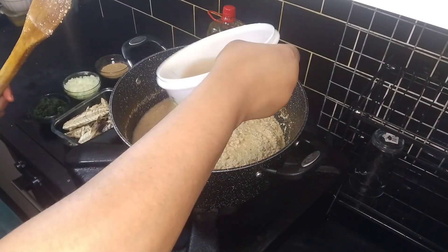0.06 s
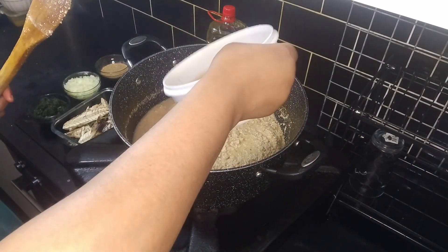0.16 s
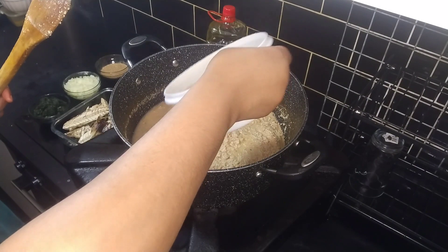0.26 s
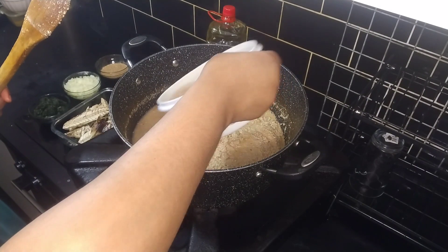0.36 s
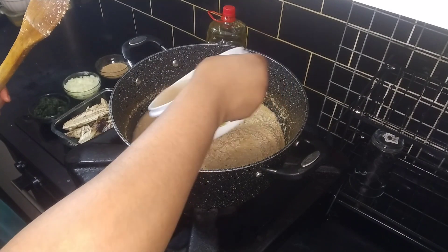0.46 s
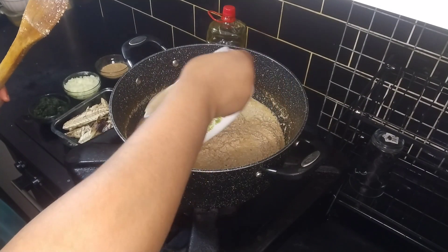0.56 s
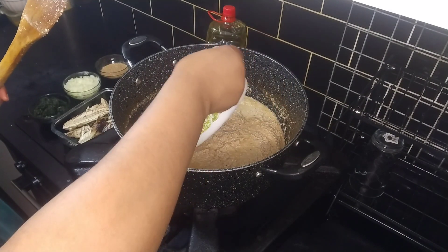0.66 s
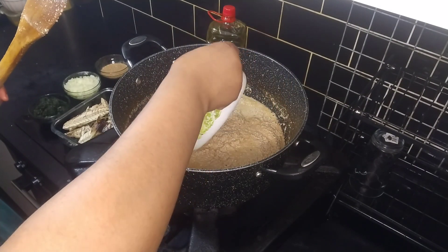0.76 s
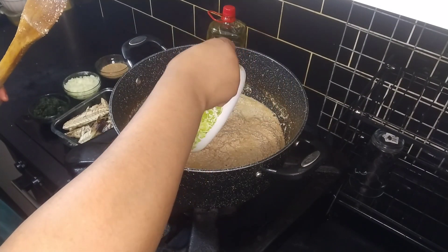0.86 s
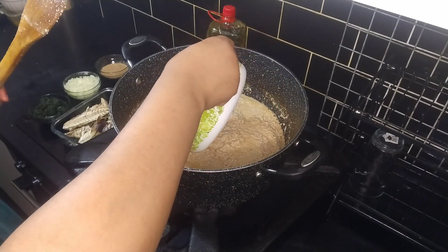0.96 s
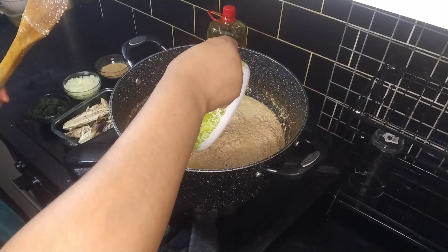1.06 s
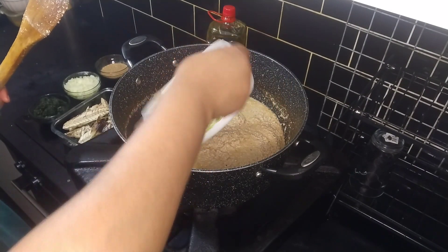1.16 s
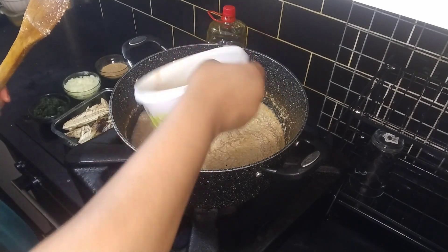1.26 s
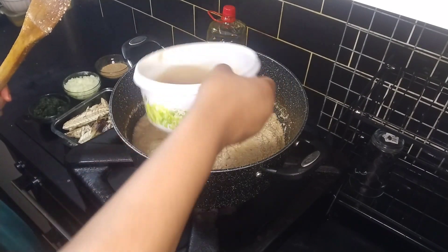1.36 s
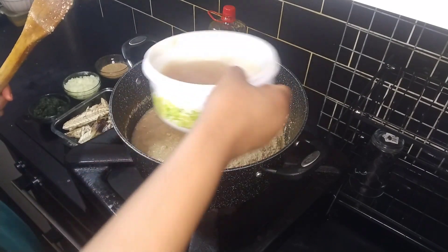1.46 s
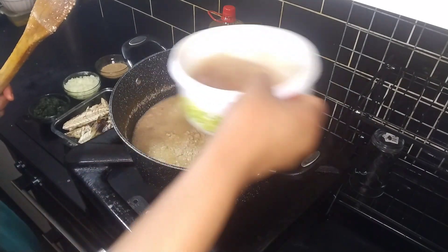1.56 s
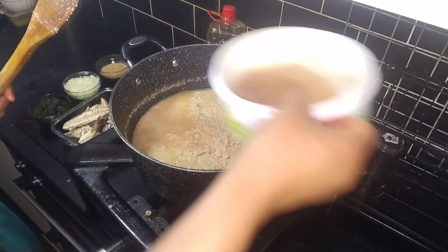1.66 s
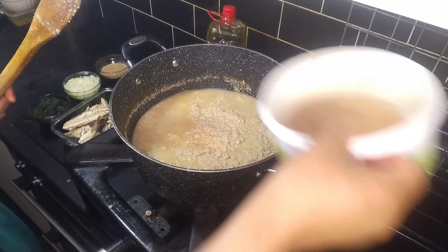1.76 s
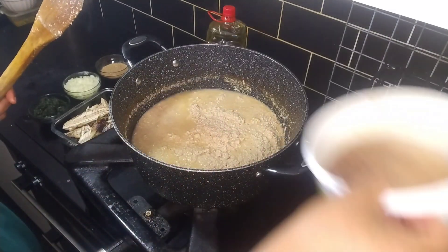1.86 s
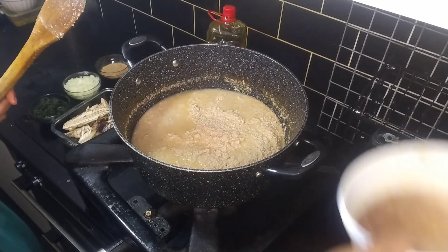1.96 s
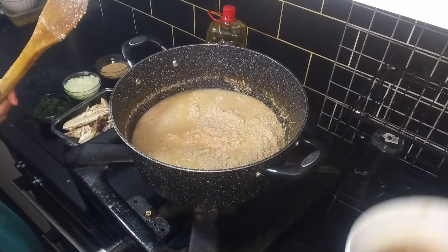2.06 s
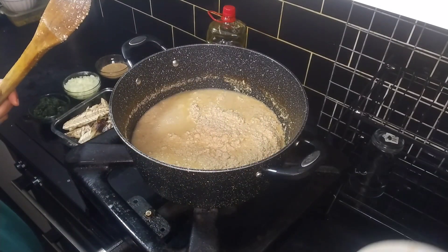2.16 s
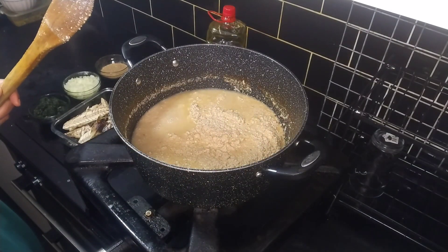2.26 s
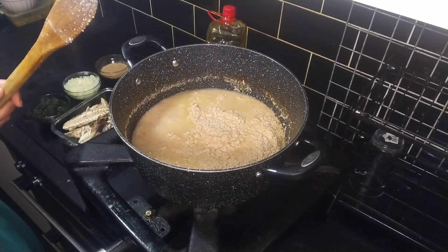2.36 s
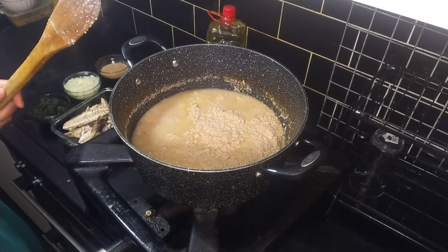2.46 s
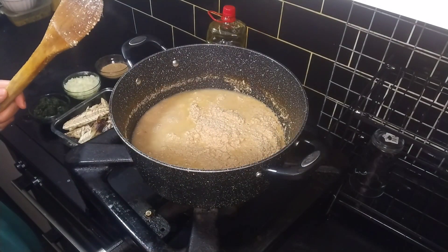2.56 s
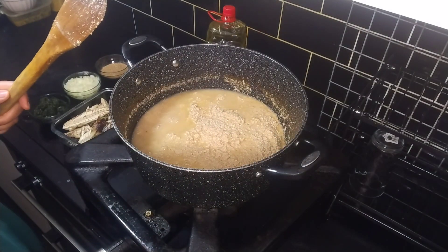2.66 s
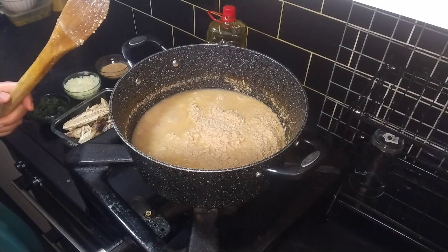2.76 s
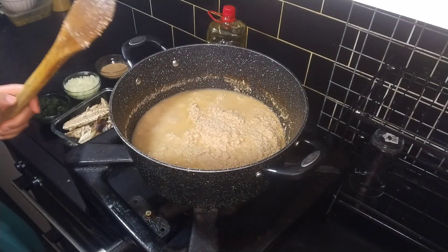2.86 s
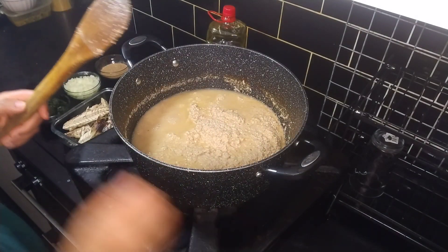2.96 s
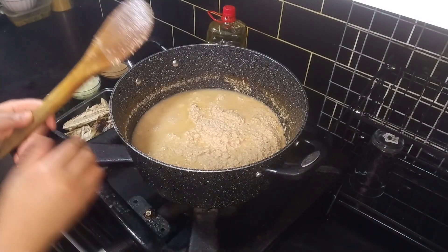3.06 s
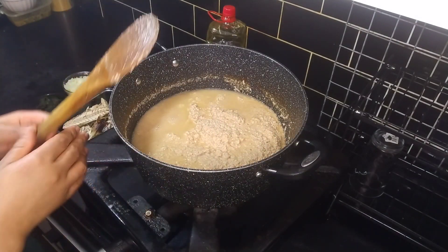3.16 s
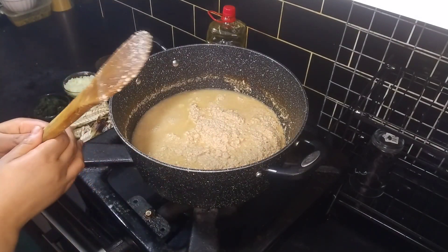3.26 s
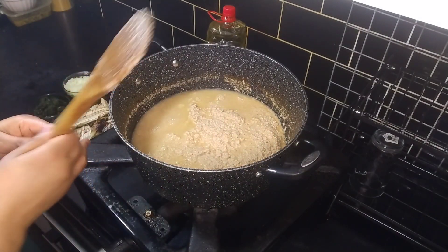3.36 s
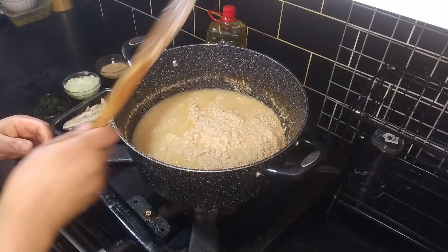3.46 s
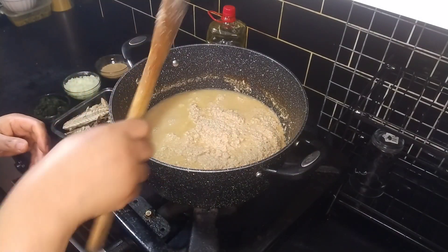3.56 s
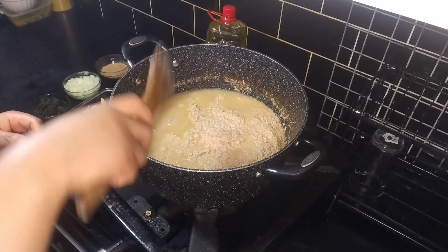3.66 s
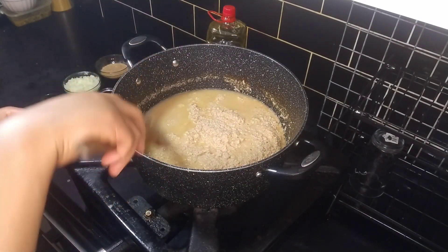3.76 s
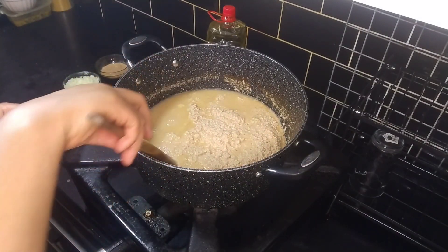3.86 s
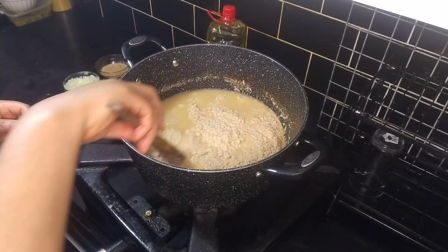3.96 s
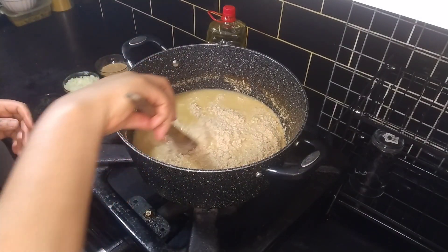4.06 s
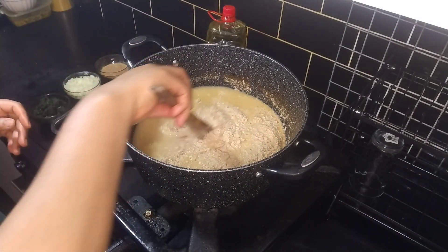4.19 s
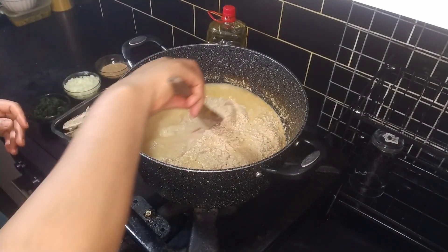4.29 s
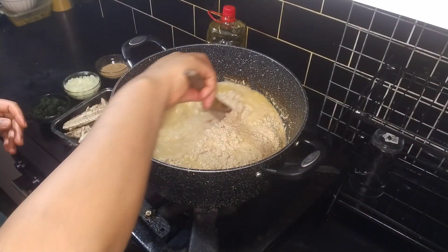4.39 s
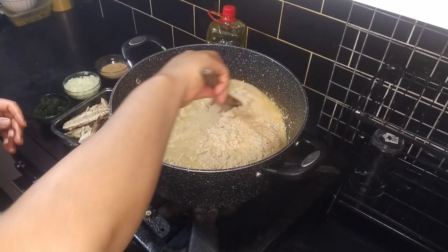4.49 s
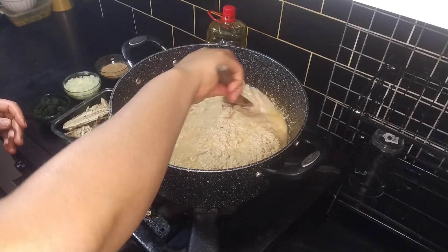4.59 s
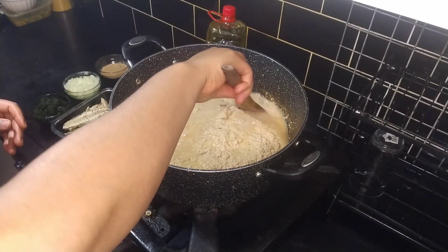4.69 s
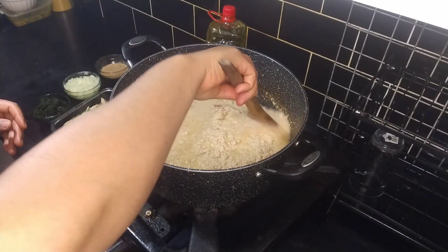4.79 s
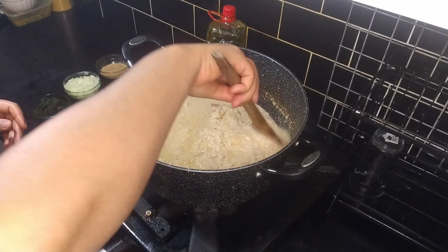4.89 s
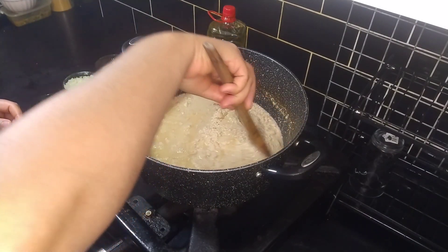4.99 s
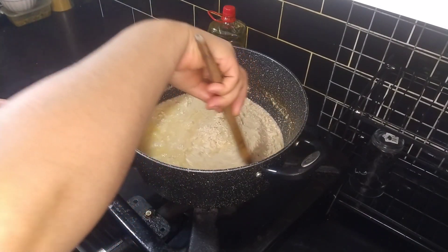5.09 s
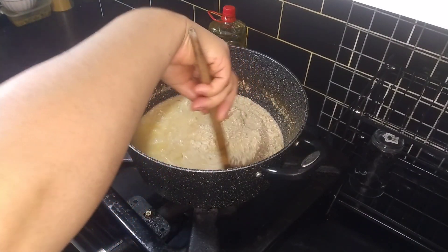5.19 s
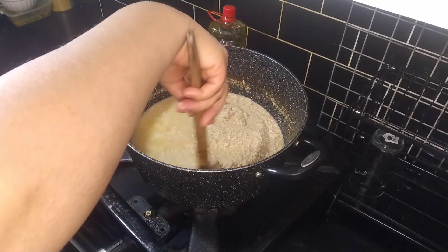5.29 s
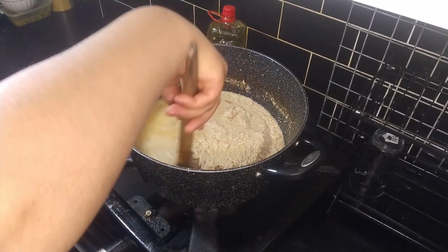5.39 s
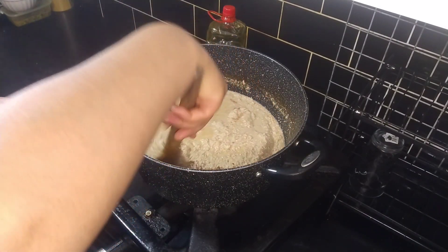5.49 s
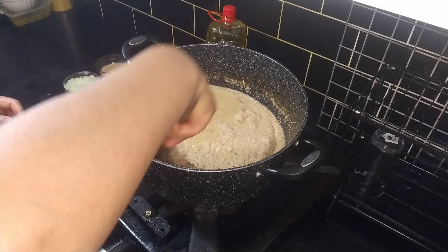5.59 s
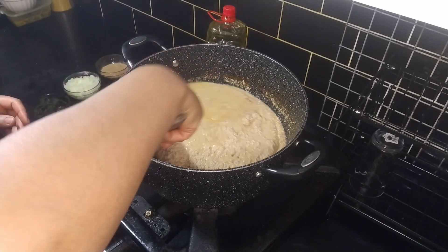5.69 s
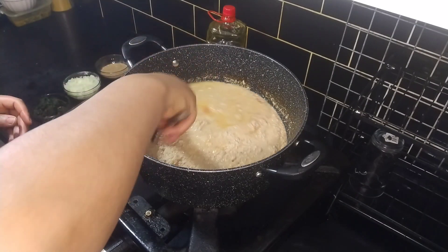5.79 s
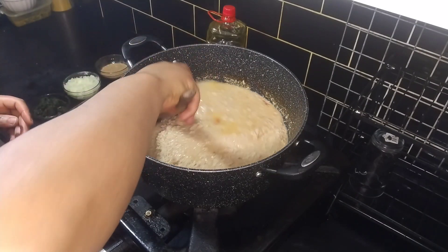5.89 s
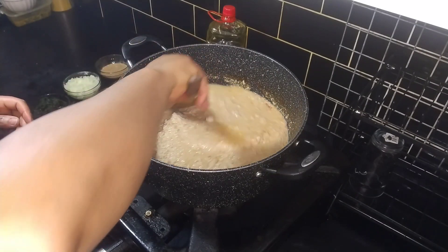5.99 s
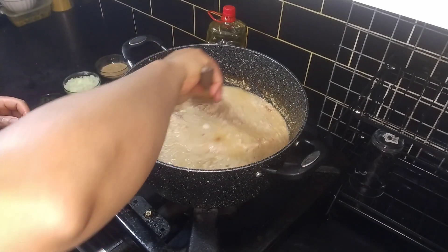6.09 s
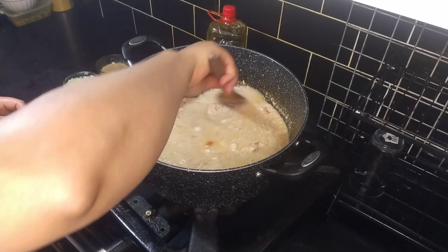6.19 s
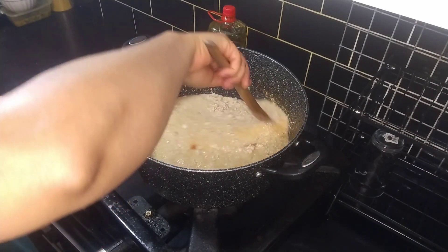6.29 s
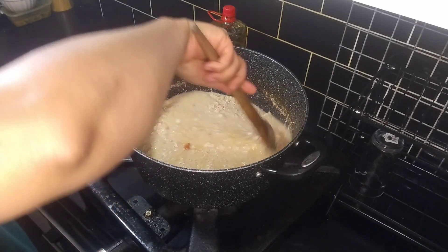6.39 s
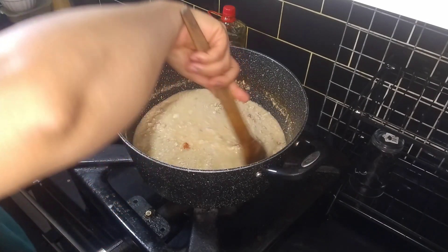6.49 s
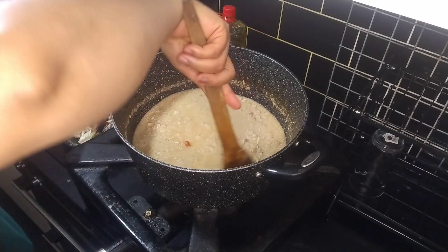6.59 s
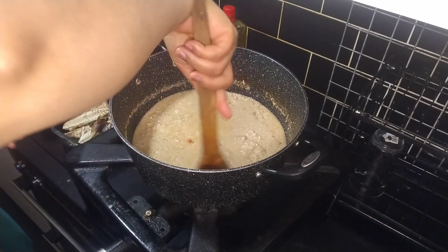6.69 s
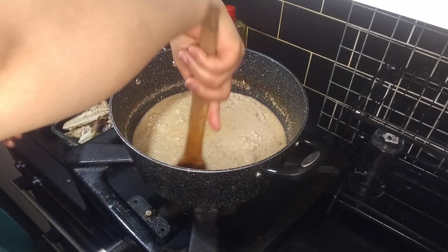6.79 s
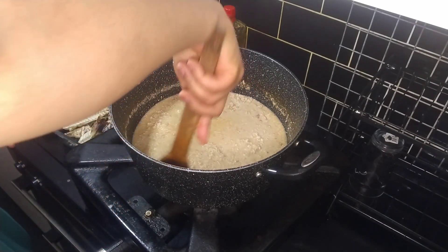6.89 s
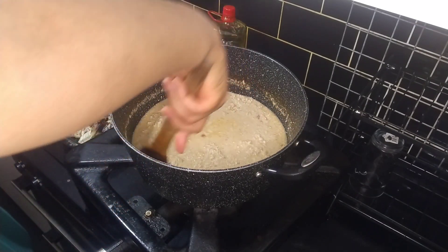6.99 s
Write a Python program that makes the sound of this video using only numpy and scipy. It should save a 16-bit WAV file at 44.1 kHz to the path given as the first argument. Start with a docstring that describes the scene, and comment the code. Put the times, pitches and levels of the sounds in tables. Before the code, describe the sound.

A bright, fine sizzle and a low mains hum run from the start while water tips into thick soup with a few wet plops and slops. A plastic jug lands with a loud hollow clack and rocks briefly. Then a wooden spoon stirs with soft squelches, light knocks and faint scrapes; one drag makes the sizzle flare before it calms. Close stereo pickup in a small tiled kitchen.

```python
"""A sizzle and a low mains hum are heard at once, as water is tipped with plops into a wide pot of thick soup.
A plastic jug is set down with a knock, and a wooden spoon taps, stirs and scrapes while the soup squelches.
The sizzle, which flares when the hot bottom is bared, is thousands of tiny clicks shaped into hiss.
Plops are short rising tones and noise; knocks are ringing tones and dying noise; squelches are many damped tones.
The room is coloured noise, and the hum is a wavering sine."""
import sys
import numpy as np
from scipy import signal
from scipy.fft import rfft, irfft
from scipy.io import wavfile

SR = 44100
rng = np.random.default_rng(int(sys.argv[2]) if len(sys.argv) > 2 else 0)


def master_out(mix):
    """Clip the mix to full scale and print it as 16-bit PCM to the path in sys.argv[1]."""
    frames = np.transpose(np.atleast_2d(mix))
    ceiling = np.clip(frames, -1, 1)
    pcm = np.round(ceiling * 32767).astype(np.int16)
    wavfile.write(sys.argv[1], SR, pcm)


N = 310391  # length in samples, about 7 seconds

# In all tables, t60_s is the time a sound takes to die away by 60 dB.
# Larger air pockets in the liquid: start_s, pitch_hz (at the start), level_db, t60_s, splashiness (0 to 1)
AIR_POCKETS = [(.341, 2160, -39.5, 0.076, 0.5), (0.769, 2970, -32.5, .035, 0.8),
               (0.806, 3150, -36, 0.076, 1), (.811, 1000, -51, .08, 1), (0.824, 426, -33.5, 0.15, 0),
               (1.042, 1030, -41, .08, .75), (1.045, 6470, -28.5, 0.066, .8), (1.074, 537, -30.5, .06, 0.4),
               (1.078, 1020, -39, 0.051, 0.93), (1.178, 2700, -36.5, 0.057, 0.7),
               (1.337, 715, -41.5, 0.098, 0.8), (1.352, 6440, -33, 0.1, 0.66),
               (1.357, 2240, -42.5, .086, 0.5), (3.602, 5300, -40, 0.045, 0.8),
               (3.804, 4060, -38, .045, 0.2), (4.712, 405, -37, 0.081, .4), (4.951, 2690, -35, 0.042, 0.34),
               (5.634, 1960, -34.5, .06, 0.46), (5.639, 1330, -40, 0.1, 0.3), (6.098, 2020, -41, .09, 0.3),
               (6.506, 1070, -29.5, .03, 0.1), (6.515, 3200, -41, 0.08, 0.44), (6.683, 406, -45, .1, 0.3),
               (6.741, 995, -43.5, .05, 0.1), (6.783, 1080, -39.5, 0.04, 0.3),
               (6.898, 1120, -43, 0.039, 0.6)]
# Light knocks of the wooden spoon: start_s, level_db (before the gains in taps)
SPOON_TAPS = [(1.076, -40.5), (2.896, -42.5), (3.541, -43.5), (4.636, -50), (5.288, -46), (5.635, -37.5),
              (5.933, -41.5), (6.306, -41.5), (6.407, -44.5), (6.415, -34)]
# Ringing tones of the spoon and the filled pot: pitch_hz, level_db, t60_s
POT_TONES = [(462, -4, 0.15), (1130, 0, 0.04), (1410, -13, 0.013), (1830, 9.5, 0.012), (3180, -21, .012),
             (5260, -4, .012), (6750, -13, .008)]
# The jug lands and rocks: start_s, clack_db, thump_db
JUG_LANDINGS = [(2.536, -11.5, -21.5), (2.579, -21, -28), (2.703, -30.5, -39), (2.745, -35, -44)]
# Ringing tones of the jug on the counter: pitch_hz, level_db, t60_s
JUG_TONES = [(670, -6.5, .2), (813, -8, 0.21), (917, -9, 0.15), (1256, -2, .22), (1373, -5, .25),
             (1473, -5, .14), (1600, -4.5, .24), (1666, -14, .22), (1880, -4, 0.18), (2490, -11, .18),
             (2930, -6, 0.16)]
# Low tones of the counter's thump: pitch_hz, level_db, t60_s
COUNTER_TONES = [(108, 1, 0.096), (72.3, -6, 0.36), (119.2, -21, 0.54), (135.5, -17.5, 0.39),
                 (254, -28, 0.32)]
# Tone colour of the jug's clack: pitch_hz, level_db (per Hz)
CLACK_COLOUR = [(200, 1), (700, -2), (1400, 7), (2800, 6), (4500, 2), (7000, 2.5), (9500, 3), (12000, -2.5),
                (16000, -12)]
# Duller tone colour of the clack's late tail: pitch_hz, level_db (per Hz)
LATE_TAIL_COLOUR = [(100, -7), (700, -5), (1150, -7), (1700, 3), (3200, -5), (5000, -5), (9000, -5)]
# Tone colour of the counter's boom: pitch_hz, level_db (per Hz)
BOOM_COLOUR = [(30, -20), (75, 2), (160, 2), (250, -9), (600, -42), (3000, -70)]
# Tone colour of the sizzle: pitch_hz, level_db (per Hz)
SIZZLE_COLOUR = [(300, -34.5), (1000, -18), (2000, -15), (3000, -10.5), (3800, -11), (4800, -10.5),
                 (5800, -8.5), (7400, -4.5), (8600, -0.5), (9600, 0), (10800, -1.5), (12000, -7),
                 (13500, -10.5), (16000, -14.5)]
# Tone colour that fresh contact with hot metal adds: pitch_hz, change_db
FRESH_COLOUR = [(1000, 0.5), (5000, -0.06), (8300, -2.5), (10400, 1), (12000, 2), (16000, -1)]
# Tone colour put on the spoon's scrape: pitch_hz, level_db
SCRAPE_COLOUR = [(100, -14), (190, 13.5), (320, 7), (600, 2), (1000, -5), (1400, -4), (2200, -4),
                 (4000, -15), (7000, -16), (15000, -8.5)]
# Tone colour put on the squelching bubbles: pitch_hz, level_db
SQUELCH_COLOUR = [(150, 2), (280, -2), (450, 3.5), (700, 2), (1100, -4.5), (1700, -9.5), (3000, 0),
                  (7000, -26)]
# Tone colour of the wet film torn by the spoon: pitch_hz, level_db (per Hz)
SMEAR_COLOUR = [(800, -26), (1700, -9.5), (2800, -8), (4600, 6), (6500, -1), (10000, -18), (16000, -30)]
# Tone colour of the pot's rumble on the stove: pitch_hz, level_db (per Hz)
RUMBLE_COLOUR = [(20, 4), (50, 10.5), (85, 9), (160, -6.5), (260, 7.5), (400, 0), (900, -44), (4000, -62)]
# Tone colour of the room's steady rush: pitch_hz, level_db (per Hz)
ROOM_COLOUR = [(15, 9), (35, 6), (55, 0), (80, -7), (140, -6.5), (210, -19), (280, -15.5), (350, -16),
               (470, -8.5), (700, -10), (1000, -16.5), (1650, -19), (2700, -16.5), (3700, -21), (7000, -11),
               (11000, -29), (16000, -29)]
# Resonances in the room's steady noise: pitch_hz, width_hz, level_db (rms)
ROOM_DRONES = [(101, 17, -70.5), (148.5, 16, -63.5), (257.7, 8.6, -68.5), (296.7, 21, -64),
               (416.4, 17, -60.5), (538, 24, -66), (637, 15, -70), (963, 14, -64), (1070, 24, -67.5),
               (2666, 130, -67), (13000, 400, -63)]
# How alike left and right are: pitch_hz, likeness (1 is the same, 0 is unrelated)
STEREO_LIKENESS = [(30, 0.55), (100, 0.77), (270, 0.83), (450, 0.91), (740, 0.28), (1200, 0.032),
                   (16000, 0.66)]
# Difference between the microphones: pitch_hz, left_minus_right_db
STEREO_BALANCE = [(30, 1.5), (100, -3), (200, 0.5), (600, 0.7), (2000, -0.2), (4500, -0.4), (8500, 2),
                  (11000, -3), (14000, -3.5)]
# Standing waves in the air of the open pot: pitch_hz, width_hz, boost_db (below 0 is a cut)
POT_AIR_TONES = [(471, 13, 8.5), (880, 39, 4), (1137, 34, 10.5), (1314, 77, 5.5), (1483, 33, 7.5),
                 (1650, 29, 10.5), (1840, 110, 6.5), (1880, 11, 2), (2230, 47, 5.5), (2880, 47, -3),
                 (4000, 100, 0.5), (4660, 330, 3)]
# Dull bumps against the stove and counter: start_s, level_db (before the gain in bumps)
SOFT_BUMPS = [(3.265, -36.5), (3.593, -36)]
# Low tones of the stove top: pitch_hz, level_db, t60_s
STOVE_TONES = [(166, -10.5, 0.072), (238, -2.5, 0.059), (306, -3.5, 0.035)]
# Surges as the water slops in: start_s, churn_db
WATER_SURGES = [(.77, -46.5), (1.04, -50.5), (1.325, -57)]
# Strokes of the spoon round the pot: start_s, length_s, churn_db
SPOON_STROKES = [(3.744, 1.6, -58.5), (5.157, 0.92, -57), (6.093, 1.9, -57.5)]
# Soup spits on the hot wall: start_s, sizzle_db (before the sizzle's overall gain)
SOUP_SPITS = [(4.06, -47), (5.275, -40.5), (5.425, -45), (5.73, -43), (6.3, -53), (6.59, -54)]
# The spoon meets the bottom and shoves the pot: start_s, rumble_db
POT_SHOVES = [(3.92, -52.5), (4.56, -55)]

HUM_HZ, HUM_DB = 99.7, -56  # the level wavers around this value
KITCHEN_T60_S = 0.27
CUTOFF_HZ = 15740
RIGHT_DELAY = 4  # samples
POUR_START_S, POUR_END_S = 0.0, 1.3
SURGE_RISE_S, SURGE_FALL_DB_PER_S = 0.054, 77
# One stroke drags along the bottom and bares the hot metal.
BARE_START_S, BARE_END_S = 5.135, 5.736
FLARE_DB, FLARE_RISE_S, FLARE_FALL_DB_PER_S = -42, 0.17, 28  # level before the sizzle's overall gain
FLARE_JUMP = 0.48  # share of the flare's gain that comes at first touch
# The frying calms as the pot cools, faster once it is stirred.
SIMMER_DB = -42  # at the start, before the sizzle's overall gain
COOLING_DB_PER_S, STIR_COOLING_DB_PER_S = 0.5652, 1.94  # the second adds to the first
SPIT_RISE_S, SPIT_FALL_DB_PER_S = 0.0052, 109
# Each landing rebounds once; the counter gives a moment after each contact.
REBOUND_S, REBOUND_LOSS_DB, THUMP_LAG_S = 0.0225, 15.5, 0.0022
# The clack dies in three stages.
CRACK_T60_S, TAIL_T60_S, LATE_T60_S = 0.06, 0.21, 0.45


def from_db(db):
    """Turn decibels into a gain."""
    return 10 ** (np.asarray(db) / 20)


def rms_one(x):
    """Scale a sound to an average (rms) level of 1."""
    return x / np.sqrt(np.mean(x ** 2) + 1e-20)


def at_hz(points, hz):
    """Read a table between its points, with pitch on a logarithmic scale."""
    table_hz, value = np.transpose(points)
    return np.interp(np.log(np.maximum(hz, 1)), np.log(table_hz), value)


def bins(x):
    """Frequencies in the spectrum of x."""
    return np.fft.rfftfreq(x.shape[-1], 1 / SR)


def colour(x, spectrum):
    """Make some pitches of a sound stronger and others weaker, then set its rms to 1."""
    gains = from_db(at_hz(spectrum, bins(x)))
    return rms_one(irfft(rfft(x) * gains, x.shape[-1]))


def drift(per_s):
    """A random wavering line with rms 1, made of straight steps between random points."""
    knots = rng.standard_normal(4000)
    return rms_one(np.interp(np.arange(N) / SR * per_s, np.arange(len(knots)), knots))


def spread(pair):
    """Mix two unrelated noises into left and right, as alike as the table says; the right comes later."""
    alike = at_hz(STEREO_LIKENESS, bins(pair))
    mid, side = rfft(pair) * np.sqrt([1 + alike, 1 - alike])
    left, right = irfft(np.array([mid + side, mid - side]), pair.shape[-1]) / np.sqrt(2)
    return np.array([left, np.roll(right, RIGHT_DELAY)])


def grains(per_s, size_db):
    """Random tiny clicks of uneven size, in two channels."""
    sizes = from_db(size_db * np.minimum(rng.exponential(1, (2, N)), 4))
    signs = rng.choice([-1, 1], (2, N))
    return sizes * signs * (rng.random((2, N)) < per_s / SR)


def ring(clicks, hz, t60):
    """Each click sets a dying sine ringing, as a tap does to a solid body or a bubble."""
    decay = np.exp(-np.log(1000) / (t60 * SR))
    turn = 2 * np.pi * hz / SR
    # the tiny offset keeps the filter away from vanishingly small numbers
    return signal.lfilter([0, np.sin(turn)], [1, -2 * decay * np.cos(turn), decay ** 2], clicks + 1e-18)


def blows(times, levels_db):
    """One click at each time."""
    clicks = np.zeros(N)
    clicks[np.round(times * SR).astype(int)] = from_db(levels_db)
    return clicks


def struck(times, levels_db, modes, vary_db):
    """Each blow rings every tone of a body, with a random strength for each tone."""
    out = np.zeros(N)
    for k, (hz, db, t60) in enumerate(modes):
        strengths_db = levels_db + db + vary_db * rng.standard_normal(len(times))
        out += (-1) ** k * ring(blows(times, strengths_db), hz, t60)
    return out


def dying_noise(spectrum, t60):
    """Half a second of fading stereo noise stands for many close tones or echoes."""
    t = np.arange(SR // 2) / SR
    noise = colour(spread(rng.standard_normal((2, len(t)))), spectrum)
    return noise * np.exp(-np.log(1000) * t / t60)


def through(x, response):
    """Every click of a mono sound starts a copy of a stereo response."""
    return signal.fftconvolve(x[None], response)[:, :N]


def kitchen(x, wet_db, near_t60=0.11, far_db=-10):
    """The direct sound comes first, with quick echoes off the tiles and a longer room echo."""
    walls = [(100, -3.0), (1000, 0.5), (8000, 3.0), (16000, -39)]
    echoes = dying_noise(walls, near_t60) + from_db(far_db) * dying_noise(walls, KITCHEN_T60_S)
    echoes = echoes / np.sqrt(np.sum(echoes ** 2) / 2)
    direct = np.array([x, np.roll(x, RIGHT_DELAY)])
    return direct + from_db(wet_db) * through(x, echoes)


def gesture(start, end, rise_s, fall_db_per_s, jump=0):
    """A gain that starts at the jump, rises to 1, holds until the end, then dies away."""
    t = np.arange(N) / SR
    rise = np.clip(jump + (1 - jump) * (t - start) / rise_s, 0, 1)
    fall = from_db(-fall_db_per_s * np.maximum(t - end, 0))
    return (t > start) * rise * fall


def swells(rows, rise_s, fall_db_per_s):
    """A rise and a fall for each start_s, level_db row, as one gain."""
    return sum(from_db(db) * gesture(s, s + rise_s, rise_s, fall_db_per_s) for s, db in rows)


def together(*gains):
    """Combine gains by adding their power, as unrelated sounds do."""
    return np.sqrt(sum(gain ** 2 for gain in gains))


def stirring(ease=0.56):
    """The spoon speeds up and slows down once in each stroke; returned as a gain."""
    t = np.arange(N) / SR
    out = np.zeros(N)
    for start, length, db in SPOON_STROKES:
        progress = np.clip((t - start) / length, 0, 1)
        out += from_db(db) * np.abs(np.sin(np.pi * progress)) ** ease
    return out


def room_tone(level_db=-48.0, waver_db=-2.5):
    """The stove and room make a steady rush of noise, with droning resonances and a mains hum."""
    rush = from_db(level_db) * colour(spread(rng.standard_normal((2, N))), ROOM_COLOUR)
    white = spread(rng.standard_normal((2, N)))
    hz_axis = bins(white)
    power = np.zeros(len(hz_axis))
    for hz, width, db in ROOM_DRONES:
        peak = from_db(db) ** 2 * SR / (np.pi * width)
        power += peak / (1 + ((hz_axis - hz) / width) ** 2) ** 2
    drone = irfft(rfft(white) * np.sqrt(power), N)
    phase = 2 * np.pi * HUM_HZ * np.arange(N) / SR + 0.54 * drift(5)
    hum = np.sqrt(2) * np.sin(phase) * from_db(HUM_DB + waver_db * drift(34))
    return rush + drone + hum


def bumps(level_db=-2):
    """Soft contacts ring only the stove top's low tones."""
    times, db = np.transpose(SOFT_BUMPS)
    return kitchen(struck(times, db + level_db, STOVE_TONES, vary_db=1), wet_db=-7)


def pot_rumble(stirred_db=-6, shove_rise_s=0.096, shove_fall_db_per_s=45):
    """Random clicks become dull bumps of the pot on the stove as the spoon pushes."""
    shoves = swells(POT_SHOVES, shove_rise_s, shove_fall_db_per_s)
    push = together(from_db(stirred_db) * stirring(), shoves)
    return colour(spread(grains(400, size_db=5.0)), RUMBLE_COLOUR) * push


def jug_set_down():
    """The jug's base clacks on the counter, which thumps and booms; the jug rocks and settles."""
    crack_db, tail_db, late_db = -8, -17, -24
    ring_db, boom_db, boom_t60 = -23, -21, 0.98
    snap_db, snap_hz, snap_t60 = -2, 1100, 0.0031
    contacts = np.array(JUG_LANDINGS)
    rebounds = contacts + [REBOUND_S, -REBOUND_LOSS_DB, -REBOUND_LOSS_DB]
    times, clack_db, thump_db = np.vstack([contacts, rebounds]).T

    response = from_db(crack_db) * dying_noise(CLACK_COLOUR, CRACK_T60_S)
    response += from_db(tail_db) * dying_noise(CLACK_COLOUR, TAIL_T60_S)
    response += from_db(late_db) * dying_noise(LATE_TAIL_COLOUR, LATE_T60_S)
    clack = through(blows(times, clack_db), response)

    snap = ring(blows(times, clack_db + snap_db), snap_hz, snap_t60)
    jug_ring = struck(times, clack_db + ring_db, JUG_TONES, vary_db=1)
    body = kitchen(jug_ring - snap, wet_db=-5)

    thump = np.zeros(N)
    for hz, db, t60 in COUNTER_TONES:
        thump += ring(blows(times + THUMP_LAG_S, thump_db + db), hz, t60)
    high_pass = signal.butter(1, 40, "high", fs=SR, output="sos")
    boom = through(blows(times, thump_db + boom_db), dying_noise(BOOM_COLOUR, boom_t60))
    return clack + body + signal.sosfilt(high_pass, thump) + boom


def taps(crack_db=-1.5, body_db=-5.5):
    """Each wooden knock is a broad click and a few tones that the soup soon damps."""
    times, db = np.transpose(SPOON_TAPS)
    wood_colour = [(200, -4), (700, 1), (1400, 8), (2400, 1), (3800, -1.5),
                   (5600, 5.5), (7500, 1), (10000, -12), (15000, -33)]
    wood = dying_noise(wood_colour, t60=0.17)
    body = kitchen(struck(times, db + body_db, POT_TONES, vary_db=1), wet_db=-5)
    return through(blows(times, db + crack_db), wood) + body


def plops(rise=0.15, splash_db=-3):
    """Each air pocket rings briefly, rising in pitch; a splashy one breaks into a spray of noise."""
    tones, sprays = np.zeros((2, N + SR))  # spare room for the last tails
    t = np.arange(SR // 4) / SR
    for s, hz, db, t60, splashy in AIR_POCKETS:
        age = t / t60
        pitch_hz = hz * (1 + rise * np.minimum(age, 1))
        tone = np.sin(2 * np.pi * np.cumsum(pitch_hz) / SR)
        around_pitch = [(hz / 10, -40), (hz / 2, -21), (hz, 0), (hz * 2, -22), (hz * 10, -50)]
        spray = colour(rng.standard_normal(len(t)), around_pitch)
        envelope = from_db(db) * np.exp(-np.log(1000) * age) * (1 - np.exp(-t * hz))
        start = round(s * SR)
        span = slice(start, start + len(t))
        tones[span] += np.sqrt(1 - splashy ** 2) * tone * envelope
        sprays[span] += splashy * from_db(splash_db) * spray * envelope
    return kitchen(tones[:N], wet_db=-6) + kitchen(sprays[:N], wet_db=1)


def small_plops(per_s=1.8, level_db=5, size_db=7.0, t60=0.054, count=10):
    """Smaller air pockets pop at random in the spoon's wake, each ringing at one of a few pitches."""
    out, speed = np.zeros(N), stirring()
    for hz in np.geomspace(420, 1250, count):
        born = rng.random(N) < per_s / SR
        sizes = from_db(level_db + size_db * rng.uniform(-0.92, 1, N))
        out += ring(born * sizes * speed, hz, t60)
    return kitchen(out, wet_db=-1.5)


def scrape(level_db=-50, bite_s=0.16, rise_s=0.13, fall_db_per_s=70, graze_db=-3.0):
    """The spoon's edge slips over the crust in small jerks: light grazes and one hard drag."""
    slips = spread(grains(1500, size_db=4.0))
    drag = from_db(level_db) * gesture(BARE_START_S + bite_s, BARE_END_S, rise_s, fall_db_per_s)
    motion = together(drag, from_db(graze_db) * stirring())
    return colour(slips, SCRAPE_COLOUR) * motion * from_db(0.73 * drift(45))


def smear(level_db=-1, per_s=900, size_db=3.5, lag_s=0.25):
    """The film of soup behind the spoon tears in many tiny wet smacks."""
    t = np.arange(N) / SR
    delayed_stir = np.interp(t - lag_s, t, stirring())
    return colour(grains(per_s, size_db), SMEAR_COLOUR) * from_db(level_db) * delayed_stir


def churn(per_s=16, cycles=14, count=24, simmer_db=-61):
    """Thick soup folds over itself: small damped bubbles ring at many pitches."""
    out = np.zeros(N)
    for hz in np.geomspace(220, 4000, count):
        born = rng.random(N) < per_s / SR
        bubbles = ring(born * rng.standard_normal(N), hz, cycles / hz)
        out += rms_one(bubbles) * np.sqrt(hz)
    surges = swells(WATER_SURGES, SURGE_RISE_S, SURGE_FALL_DB_PER_S)
    motion = together(from_db(simmer_db), surges, stirring())
    return colour(kitchen(out, wet_db=0.5), SQUELCH_COLOUR) * motion


def frying_db(pour_db=-49.5, pour_rise_s=0.02, pour_fall_db_per_s=45, stirred_db=-1.0):
    """A slowly cooling sizzle is fed by poured water, stirring, the bared bottom and single spits."""
    t = np.arange(N) / SR
    stirred_s = np.maximum(t - SPOON_STROKES[0][0], 0)
    simmer = from_db(SIMMER_DB - COOLING_DB_PER_S * t - STIR_COOLING_DB_PER_S * stirred_s)
    poured = from_db(pour_db) * gesture(POUR_START_S, POUR_END_S, pour_rise_s, pour_fall_db_per_s)
    bared = gesture(BARE_START_S, BARE_END_S, FLARE_RISE_S, FLARE_FALL_DB_PER_S, FLARE_JUMP)
    flare = from_db(FLARE_DB) * bared
    spits = swells(SOUP_SPITS, SPIT_RISE_S, SPIT_FALL_DB_PER_S)
    return 20 * np.log10(together(simmer, poured, from_db(stirred_db) * stirring(), flare, spits))


def freshness(share=0.8, wetting_s=1.4, fade_db_per_s=6):
    """Liquid newly touching bare metal changes the frying colour for a while; 0 is none."""
    poured = gesture(POUR_START_S, POUR_END_S, wetting_s, fade_db_per_s)
    bared = gesture(BARE_START_S, BARE_END_S, FLARE_RISE_S, fade_db_per_s, jump=1)
    return share * np.maximum(poured, bared)


def crackle(per_s=22, size_db=3.0, level_db=-12):
    """Now and then a larger steam burst ticks out of the sizzle."""
    tick = dying_noise([(1000, -32), (3500, -4), (6000, -4), (10000, 0), (15000, -1)], t60=0.016)
    bursts = grains(per_s, size_db)[0] * from_db(frying_db() + level_db)
    return through(bursts, tick)


def pot_walls(pair, echo_db=-21, count=10):
    """Short reflections off the pot wall and tiles ripple the tone, differently left and right."""
    lags = (rng.uniform(0.0005, 0.008, (count, 2)) * SR).astype(int)
    echoes = np.zeros_like(pair)
    for left_lag, right_lag in lags:
        echoes += np.array([np.roll(pair[0], left_lag), np.roll(pair[1], right_lag)])
    return rms_one(pair + from_db(echo_db) * echoes)


def pot_air(x):
    """Standing waves in the pot's air strengthen or weaken narrow bands of the sound inside it."""
    out = x
    for hz, width_hz, boost_db in POT_AIR_TONES:
        b, a = signal.iirpeak(hz, hz / width_hz, fs=SR)
        out = out + (from_db(boost_db) - 1) * signal.lfilter(b, a, x + 1e-18)
    return out


def sizzle(level_db=4.0, flicker_db=1.06, dull_hz=11500, dull_below_db=-44, dull_range_db=14):
    """Thousands of tiny steam bursts a second; as frying calms they thin out and lose high treble."""
    heat_db = frying_db()
    bursts = grains(14000 * from_db(heat_db - heat_db.max()), size_db=2.5)
    mixed = rms_one(bursts) + 1.14 * rng.standard_normal((2, N))
    hiss = colour(pot_walls(mixed), SIZZLE_COLOUR)
    hiss = hiss + freshness() * (colour(hiss, FRESH_COLOUR) - hiss)
    low_pass = signal.butter(2, dull_hz, fs=SR, output="sos")
    dull = signal.sosfiltfilt(low_pass, hiss)
    calm = np.clip((dull_below_db - heat_db) / dull_range_db, 0, 1)
    return (hiss + calm * (dull - hiss)) * from_db(heat_db + level_db + flicker_db * drift(60))


def scene():
    """Add up everything in the kitchen, left and right."""
    background = room_tone() + bumps() + pot_rumble() + jug_set_down()
    liquid = plops() + small_plops() + crackle()
    in_pot = pot_air(scrape() + smear() + churn() + sizzle())
    return background + taps() + liquid + in_pot


def record(dry):
    """The two microphones differ a little in colour; the top is cut steeply."""
    hz = bins(dry)
    balance = from_db(at_hz(STEREO_BALANCE, hz) * np.array([[0.5], [-0.5]]))
    low_pass = 1 / np.sqrt(1 + (hz / CUTOFF_HZ) ** 400)
    return irfft(rfft(dry) * balance * low_pass, N)


dry = scene()
out = record(dry)
master_out(out)
```